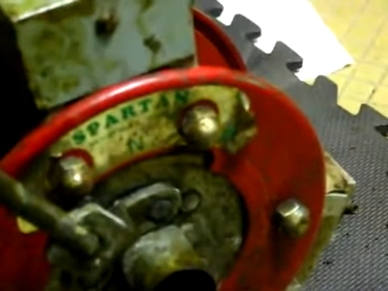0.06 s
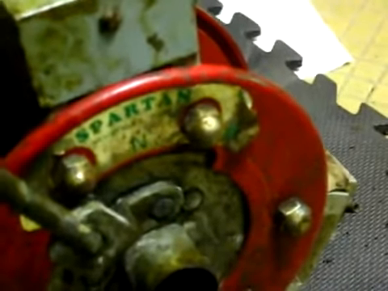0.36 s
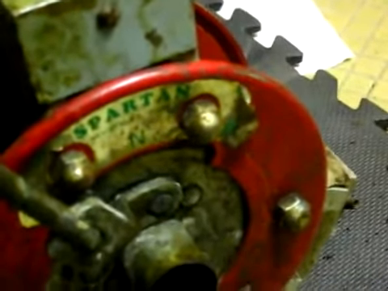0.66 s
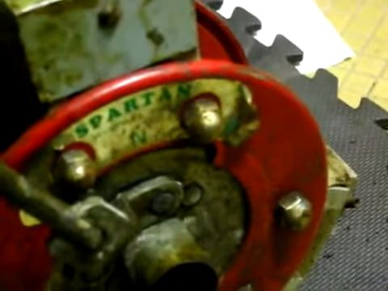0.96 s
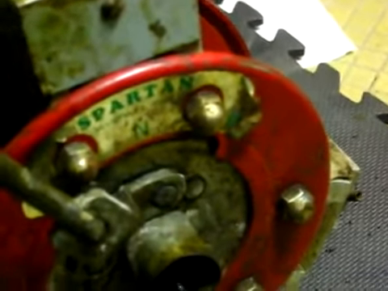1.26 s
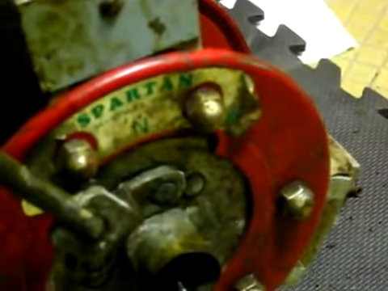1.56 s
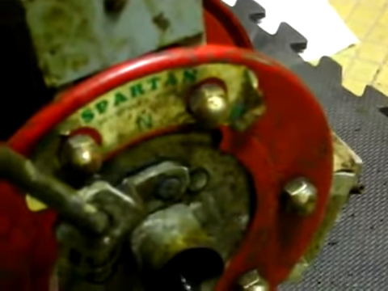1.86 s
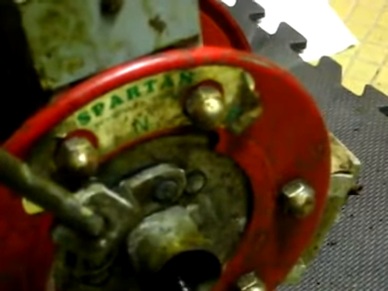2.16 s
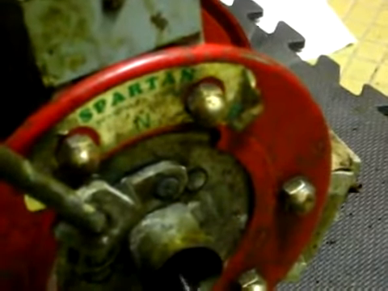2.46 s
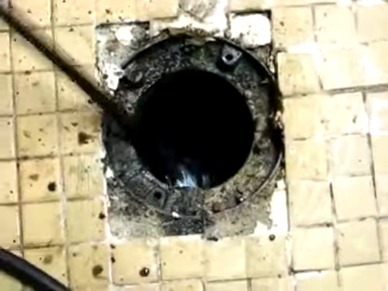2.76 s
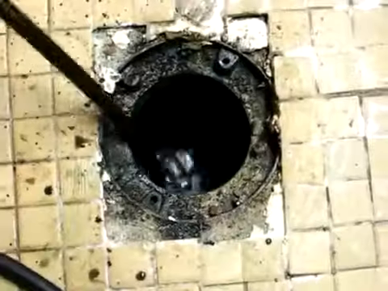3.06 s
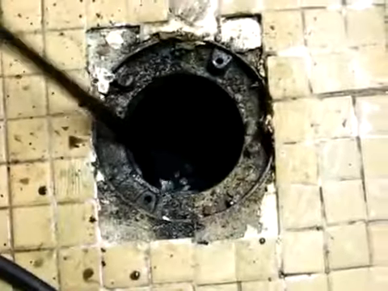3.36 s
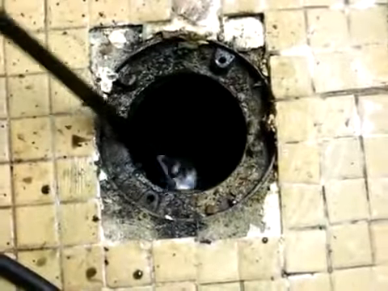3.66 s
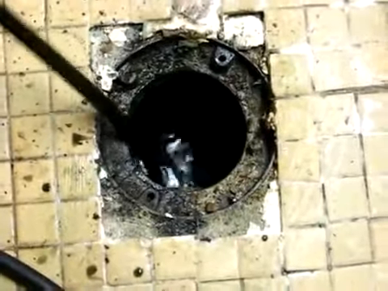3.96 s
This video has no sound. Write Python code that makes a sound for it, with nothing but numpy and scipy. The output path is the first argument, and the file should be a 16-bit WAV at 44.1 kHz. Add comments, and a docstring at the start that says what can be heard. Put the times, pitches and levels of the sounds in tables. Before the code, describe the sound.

Close to its drum, a drain cleaning machine runs with a loud, slightly pulsing grind, hollow knocks and steel scrapes. The sound drops out for an instant, then continues with the cable rhythmically rasping and ringing on a drain's rim.

```python
"""Drain cleaner in a tiled room.

A motorised drain cleaner spins its steel cable, heard first at the drum, then, after a short
silence, at the floor drain. The coils grind and ring the metalwork while the cable thumps and knocks.
At the drum, steel scrapes, clanks and ticks; at the drain, the cable rubs and strikes the iron rim."""
import sys
import numpy as np
from scipy import signal
from scipy.fft import rfft, irfft
from scipy.io import wavfile
from scipy.ndimage import uniform_filter1d

SR = 44100
rng = np.random.default_rng(int(sys.argv[2]) if len(sys.argv) > 2 else 0)


def generate_wav(signal):
    """Clip the signal to [-1, 1] and save it as 16-bit WAV at the path in sys.argv[1]."""
    frames = np.transpose(np.atleast_2d(signal))
    scaled = np.clip(frames, -1, 1) * 32767
    pcm = np.round(scaled).astype(np.int16)
    wavfile.write(sys.argv[1], SR, pcm)


N = 176400
LEAVE_DRUM_S, REACH_DRAIN_S = 2.662, 2.763
TURN_HZ, FIRST_SLIP_S = 4.721, 2.914
SLIP_TIMES_S = FIRST_SLIP_S + np.arange(6) / TURN_HZ  # the cable slips off the rim once a turn
# Bright crack of steel on steel: freq_hz, gain_db
CRACK_EQ = [(300, -17), (800, 2), (1400, -1), (2300, 7.5), (3000, -8), (4500, 0.5), (6200, -13)]


def grinding(rattle_eq, rattle_db, metalwork, pressure_db):
    """Coils rattle against steel, shaken by the drive; the metalwork rings along."""
    chatter_hz, chatter_depth = 58.7, 0.084
    chatter_cycles = np.cumsum(chatter_hz * (1 + .02 * walk(5.02))) / SR
    shake = 1 + chatter_depth * np.cos(2 * np.pi * chatter_cycles)
    force = shake * undb(pressure_db + 1.76 * walk(45))
    rattle = colour(force * contacts(per_s=4500, spread_db=2), rattle_eq)
    ringing = modes(force * contacts(per_s=4500, spread_db=2), metalwork)
    return undb(rattle_db) * room(rattle) + ringing


def drum_grind():
    """The coils grind in the drum, surging with the load."""
    # Body of the rattle: freq_hz, gain_db
    rattle_eq = [(30, -30), (65, -26), (97, -36.5), (146, -16), (178, -17.5), (221, -0.5), (246, -6),
                 (274, -14.5), (450, -9), (559, 1), (678, -7), (806, 0.5), (900, -3), (1330, -15),
                 (2130, -10.5), (2650, -14), (2820, -21.5), (3220, -17), (5290, -28), (5890, -63),
                 (7000, -54)]
    # Ringing metalwork: pitch_hz, width_hz, level_db
    metalwork = [(497.3, 11, -42), (564, 29, -36.5), (628, 23, -43.5), (716, 9, -42), (800, 12, -35),
                 (902, 20, -50), (958.6, 15, -35), (1023, 12, -43), (1652, 40, -44), (1800, 13, -55),
                 (1906, 9, -46), (2120, 47, -43), (2660, 11, -44), (3060, 28, -52), (3270, 6.4, -58.5),
                 (4090, 47, -57.5)]
    # Load on the coils: time_s, relative_db
    load = [(0, 7), (.03, -2.5), (.08, 0.5), (.14, -0.5), (.22, 5), (.32, 2.5), (.42, -1), (.52, 0),
            (.62, 2), (.93, -0.5), (1.0, -0.5), (1.05, -1), (1.12, -2.5), (1.28, -0.5), (1.33, 2),
            (1.52, -0.5), (1.7, -2.5), (1.9, 0.5), (2.22, -0.5), (2.33, 1), (2.41, 4.5), (2.48, -1.5),
            (2.64, 1.5)]
    pressure_db = np.interp(clock(), *np.array(load).T)
    return grinding(rattle_eq, rattle_db=-27, metalwork=metalwork, pressure_db=pressure_db)


def drain_grind():
    """The coils grind at the drain, easing just after each slip."""
    # Body of the rattle: freq_hz, gain_db
    rattle_eq = [(30, -36), (65, -26), (97, -31.5), (160, -20.5), (216, -5.5), (274, -14), (395, -5.5),
                 (440, -10), (571, -1.5), (664, -6.5), (938, -3.5), (1000, -12), (1070, -9), (1510, -13),
                 (1830, -13), (2480, -12.5), (2750, -25), (2950, -20), (5170, -34), (7000, -59.5)]
    # Ringing metalwork: pitch_hz, width_hz, level_db
    metalwork = [(575, 12, -42.5), (702, 18, -52), (782, 13, -41), (880, 17, -52), (947.4, 13, -39),
                 (1047.5, 13, -40.5), (1838, 13, -41), (2068, 24, -42.5), (2216, 27, -43.5),
                 (2630, 22, -44.5), (2636, 26, -48), (3310, 24, -50), (5000, 25, -69)]
    # Load on the coils: time_s, relative_db
    load = [(2.77, -4.5), (2.8, -5.5), (2.9, -0.5), (3.0, -1.5), (3.06, -0.5), (3.22, -1), (3.32, -1),
            (4.0, -0.8)]
    release = sum(swell(at + .03, attack_s=0.024, decay_s=0.018) for at in SLIP_TIMES_S)
    pressure_db = np.interp(clock(), *np.array(load).T) - 3.5 * release
    return grinding(rattle_eq, rattle_db=-29, metalwork=metalwork, pressure_db=pressure_db)


def thumps():
    """The cable whips against its housing with low thuds."""
    # Whips of the cable: peak_s, relative_db, pitch_hz
    whips = [(0.077, -28.5, 224), (0.197, -27.5, 225), (0.528, -29, 220), (.596, -33.5, 234),
             (.735, -21, 225), (0.802, -29.5, 228), (0.938, -22.5, 231), (1.152, -29.5, 232),
             (1.359, -25.5, 234), (1.438, -20.5, 233), (1.563, -22, 233), (1.644, -26, 227),
             (1.759, -21.5, 225), (1.863, -24, 227), (1.912, -31, 219), (1.982, -22.5, 226),
             (2.062, -26, 226), (2.186, -22, 231), (2.4, -24, 237), (2.437, -25.5, 214),
             (2.584, -20.5, 229), (2.768, -23.5, 243), (2.971, -24.5, 228), (3.186, -22, 223),
             (3.284, -26.5, 228), (3.374, -22, 214), (3.405, -20.5, 222), (3.46, -31, 223),
             (3.62, -14, 221), (3.832, -19.5, 225)]
    # Dull rub in each thud: freq_hz, gain_db
    rub_eq = [(70, -35.5), (130, -18), (170, -3), (230, 7), (290, 1), (390, 3), (600, -3), (1200, -11),
              (2500, -39.5)]
    length_s = 0.017
    hits = [(*whip, length_s) for whip in whips]
    return blows(hits, rub_eq, rough=0.68, lead_s=0.0044, sag=0.065, waver=0.039, gain_db=-5.5)


def knocks():
    """The cable knocks hollowly, higher than the thumps; at the drain, the iron rim rings low just after each
    strike."""
    # Knocks of the cable, then from 2.93 s the rim's low ring after each strike: peak_s, relative_db, pitch_hz,
    # length_s
    hits = [(.078, -20.5, 805, 0.023), (.168, -21, 817, .009), (.234, -30, 574, 0.0055),
            (.287, -24, 804, 0.0068), (.314, -33, 535, 0.0072), (.641, -16.5, 564, 0.0093),
            (.733, -23.5, 542, 0.02), (.795, -22, 795, 0.011), (.835, -24.5, 541, 0.026),
            (.853, -20.5, 938, .01), (.925, -23.5, 814, 0.017), (1.045, -25.5, 790, 0.0086),
            (1.06, -15, 567, 0.0098), (1.246, -22, 573, 0.025), (1.312, -24, 908, .014),
            (1.457, -16.5, 564, .011), (1.515, -19.5, 780, 0.007), (1.572, -20, 810, 0.011),
            (1.645, -27, 797, 0.011), (1.685, -22.5, 790, .008), (2.072, -18.5, 562.5, 0.014),
            (2.115, -22, 804, 0.013), (2.18, -21.5, 536, 0.0072), (2.225, -27, 804, 0.019),
            (2.287, -19.5, 563, 0.012), (2.372, -23, 580, .008), (2.489, -20.5, 551, .013),
            (2.768, -23, 587, 0.007), (2.932, -26, 567, 0.022), (3.133, -21, 568, 0.014),
            (3.351, -19, 569, 0.012), (3.571, -19.5, 575, 0.014), (3.781, -17.5, 581, .018),
            (3.991, -20, 574, 0.0079)]
    # Midrange rub in each knock: freq_hz, gain_db
    rub_eq = [(200, -24.5), (400, -5), (560, -2), (680, -5.5), (800, -1), (1100, -8.5), (2200, -19),
              (4000, -36.5)]
    return blows(hits, rub_eq, rough=0.69, lead_s=0.0075, sag=0.0033, waver=0.052, gain_db=-2.0)


def blows(hits, rub_eq, rough, lead_s, sag, waver, gain_db):
    """The cable rubs, then swells one resonance whose pitch wavers and sags as the contact relaxes."""
    t, out = clock(), np.zeros(N)
    rub = colour(rng.standard_normal(N), rub_eq)
    drift = waver * walk(90)
    for (at, db, hz, length_s), phase in zip(hits, rng.random(len(hits))):
        arch = 1 - np.hypot(1, (t - at) / length_s)  # rounded top, steady slopes
        cycles = hz * (t - at + sag * length_s * arch) + drift
        tone = np.sqrt(2) * np.sin(2 * np.pi * (cycles + phase)) * np.exp(2.0 * arch)
        scuff = rough * rub * swell(at - lead_s, length_s, 0.51 * length_s)
        out += undb(db + gain_db) * (tone + scuff)
    return out


def drum_clanks():
    """Steel strikes the drum with a hard crack."""
    # Strikes on the drum: start_s, level_db
    hits = [(.061, -23), (.382, -22.5), (1.792, -24.5), (2.209, -18)]
    # Ring of the drum: pitch_hz, width_hz, gain_db
    partials = [(840, 30, 2.5), (962, 57, -8.5), (1650, 70, -8), (2020, 70, -12.5), (2240, 73, 0),
                (2380, 90, -6), (2690, 52, -4.5)]
    return clanks(hits, partials, crack_db=1.5)


def rim_clanks():
    """The cable strikes the drain's iron rim, more ring than crack."""
    # Strikes on the rim: start_s, level_db
    hits = [(2.915, -18), (3.125, -20.5), (3.195, -32), (3.338, -24), (3.373, -24.5), (3.419, -33),
            (3.548, -28), (3.588, -26.5), (3.762, -21), (3.862, -27), (3.975, -19)]
    # Ring of the rim: pitch_hz, width_hz, gain_db
    partials = [(589, 25, -2.5), (1857, 29, -0.5), (2090, 45, -10), (2216.4, 71, -2.5), (2330, 55, -11),
                (2510, 49, -12), (3270, 50, -15.5)]
    return clanks(hits, partials, crack_db=-12)


def clanks(hits, partials, crack_db):
    """A blow cracks and sets the metal ringing, a little differently each time."""
    t, out = clock(), np.zeros(N)
    crack = colour(rng.standard_normal(N), CRACK_EQ)
    for (at, db), phases in zip(hits, rng.random((len(hits), len(partials)))):
        span = (t >= at) & (t < at + .2)
        dt = t[span] - at
        tone = sum(undb(gain_db) * np.exp(-np.pi * width * dt) * np.sin(2 * np.pi * (hz * dt + phase))
                   for (hz, width, gain_db), phase in zip(partials, phases))
        out[span] += undb(db) * (tone + undb(crack_db) * crack[span] * np.exp(-dt / 0.0035))
    return out


def scrapes():
    """Brief bright rasps stand out from the coils' constant sliding in the drum."""
    # Coils rasping over steel: time_s, relative_db
    rasps = [(0.145, -26.5), (.236, -38), (.315, -30.5), (.353, -26.5), (0.514, -32), (0.757, -29.5),
             (.811, -34), (0.963, -25.5), (1.084, -46), (1.16, -27.5), (1.209, -25), (1.304, -29),
             (1.567, -28), (1.601, -31), (1.639, -31), (1.795, -30), (1.929, -30.5), (1.955, -32),
             (2.015, -29.5), (2.061, -33), (2.153, -25.5), (2.185, -34.5), (2.214, -38), (2.263, -29.5),
             (2.329, -29), (2.445, -28.5), (2.481, -31), (2.55, -30), (2.599, -28), (2.644, -31)]
    sliding_db = -47.5
    force = sum(undb(db) * swell(at - .004, attack_s=0.0049, decay_s=0.012) for at, db in rasps)
    return undb(-1.5) * room((force + undb(sliding_db)) * coils(grains_per_s=4300, ring_db=1.0))


def rim_rub():
    """The cable hisses grittily on the drain's rim, bearing ever harder until it slips off."""
    press_db, steady_db = -36, -44
    press = sum(swell(at - .008, attack_s=0.046, decay_s=0.01) for at in SLIP_TIMES_S)
    flutter = undb(1.6 * walk(260) + .7 * walk(35))
    force = (undb(press_db) * press + undb(steady_db)) * flutter
    return force * coils(grains_per_s=2400, ring_db=-6.0)


def coils(grains_per_s, ring_db):
    """Sliding contact: a gritty hiss and the ring of the coils, at rms 1."""
    # Hiss of sliding steel: freq_hz, gain_db
    hiss_eq = [(500, -27), (1500, 6.5), (2800, -0.5), (4200, 6), (5300, 5.5), (6000, -19), (7000, -37.5)]
    # Ring of the coils: pitch_hz, width_hz, relative_db
    partials = [(3135, 43, 4), (3322, 22, 2.5), (3430, 24, -7.5), (4010, 63, 0), (4145, 100, 0.5),
                (4520, 60, -8), (4320, 26, 0), (4820, 21, -6), (5500, 42, -16.5), (5190, 70, -1.5),
                (5770, 13, -3.5)]
    grit = contacts(grains_per_s, spread_db=-0.1)
    return unit(colour(grit, hiss_eq) + undb(ring_db) * unit(modes(grit, partials)))


def slides():
    """A rough hollow note glides as the point of contact runs along the housing."""
    # Slides of the cable: peak_s, level_db, pitch_hz, length_s, glide_hz_per_s
    notes = [(.085, -28, 625, 0.025, -4500), (0.262, -30.5, 712, 0.026, 4506),
             (0.703, -26.5, 654, 0.017, -9000), (0.742, -24, 588, 0.014, 6505),
             (1.487, -31.5, 680, 0.014, 5501)]
    t, out = clock(), np.zeros(N)
    drift, flutter = 0.082 * walk(200), undb(2 * walk(270))
    for at, db, hz, length_s, glide in notes:
        dt = t - at
        cycles = hz * dt + glide * dt ** 2 / 2 + drift
        out += undb(db) * np.exp(-(dt / length_s) ** 2 / 2) * np.sin(2 * np.pi * cycles)
    return out * flutter


def ticks():
    """Loose steel parts tick dryly and irregularly in the drum, a few sharper than the rest."""
    # Sharper ticks of loose steel: start_s, relative_db
    accents = [(0.208, -17), (0.235, -22), (0.304, -19), (0.3441, -16), (0.5107, -11.5), (0.5634, -17),
               (0.5856, -12.5), (0.6097, -15), (0.6337, -16), (0.6669, -26), (0.8104, -22), (0.8504, -33),
               (0.955, -12), (1.156, -13), (1.2008, -15.5), (1.297, -20), (1.465, -16), (1.5973, -13),
               (1.7273, -14.5), (2.1804, -17.5), (2.3744, -21), (2.414, -25), (2.4444, -22), (2.5451, -20)]
    small_per_s, small_db, accent_gain_db, decay_s = 170, -40, -8.5, 0.0023
    small = (rng.random(N) < small_per_s / SR) * rng.uniform(0.26, 1, N)
    sharp = np.zeros(N)
    for at, db in accents:
        sharp[int(at * SR)] = undb(db + accent_gain_db)
    fade = lambda hits: signal.lfilter([1], [1, -np.exp(-1 / (decay_s * SR))], hits)
    envelope = undb(small_db) * unit(fade(small)) + fade(sharp)
    return envelope * colour(rng.standard_normal(N), CRACK_EQ)


def room(x):
    """Tiled walls add a short dense tail."""
    t60_s, wet_gain = 0.25, undb(-12.5)
    t = clock()[:SR // 2]
    tail = rng.standard_normal(len(t)) * np.exp(-np.log(1000) * t / t60_s) * (t > .003)
    wet = signal.fftconvolve(x, tail / np.linalg.norm(tail))[:N]
    return (x + wet_gain * wet) / np.hypot(1, wet_gain)


def contacts(per_s, spread_db):
    """Dense tiny impacts of uneven strength."""
    hit = rng.random(N) < per_s / SR
    polarity = np.sign(rng.standard_normal(N))
    strength = undb(spread_db * np.minimum(rng.exponential(size=N), 5))
    return unit(hit * polarity * strength)


def modes(x, partials):
    """A set of resonances driven by x, with their low skirts cut away."""
    out = sum(undb(db) * ring(x, hz, width) for hz, width, db in partials)
    return signal.sosfilt(signal.butter(2, 330, "high", fs=SR, output="sos"), out)


def ring(x, hz, width_hz):
    """One resonance driven by x, at rms 1."""
    r = np.exp(-np.pi * width_hz / SR)
    return unit(signal.lfilter([1, 0, -1], [1, -2 * r * np.cos(2 * np.pi * hz / SR), r * r], x))


def colour(x, eq):
    """Shape a sound with an EQ curve, at rms 1."""
    hz, db = np.array(eq, float).T
    freqs = np.maximum(np.fft.rfftfreq(N, 1 / SR), 1)
    gain = undb(np.interp(np.log(freqs), np.log(hz), db))
    return unit(irfft(rfft(x) * gain, N))


def swell(at, attack_s, decay_s):
    """Envelope that grows to a peak and dies away."""
    dt = clock() - at
    return np.exp(np.minimum(dt / attack_s, -dt / decay_s))


def walk(rate_hz):
    """Smooth random drift at rms 1."""
    hold = max(int(SR / rate_hz), 1)
    steps = rng.standard_normal(N)[np.arange(N) // hold]
    return unit(uniform_filter1d(uniform_filter1d(steps, hold), hold))


def undb(db):
    """Decibels to gain."""
    return 10 ** (np.asarray(db) / 20)


def unit(x):
    """Scale to rms 1."""
    return x / np.sqrt(np.mean(x ** 2) + 1e-20)


def clock():
    """Time of every sample in seconds."""
    return np.arange(N) / SR


def scene():
    """The drum, then the drain; thumps and knocks run through both positions, and at the drain the rim rings
    low after each strike."""
    drum = drum_grind() + ticks() + scrapes() + slides() + drum_clanks()
    drain = drain_grind() + rim_rub() + rim_clanks()
    return (np.where(clock() < LEAVE_DRUM_S, drum, drain) + thumps() + knocks())[None]


def record(dry):
    """The microphone rounds peaks, the sound drops out between positions and the top is cut steeply."""
    ceiling, top_hz = 0.3, 6200
    t = clock()
    gate = uniform_filter1d(((t < LEAVE_DRUM_S) | (t > REACH_DRAIN_S)) * 1., size=40)
    rounded = ceiling * np.tanh(dry / ceiling)
    gated = rounded * np.maximum(gate, undb(-70))
    return signal.sosfilt(signal.butter(24, top_hz, fs=SR, output="sos"), gated)


dry = scene()
out = record(dry)
generate_wav(out)
```